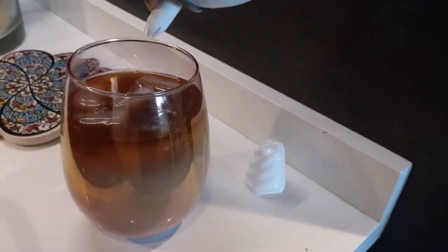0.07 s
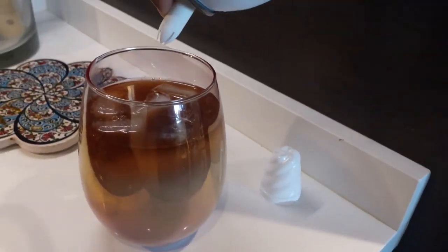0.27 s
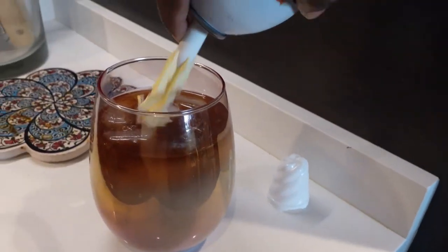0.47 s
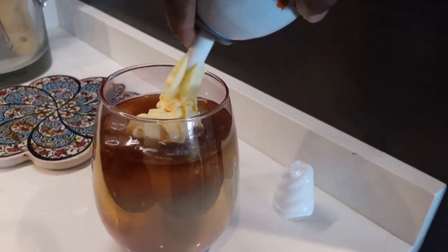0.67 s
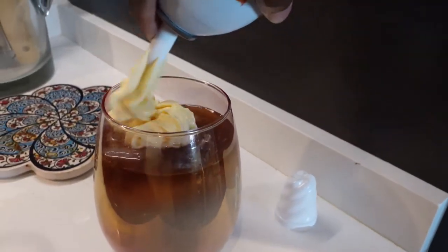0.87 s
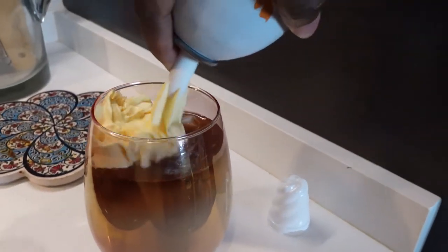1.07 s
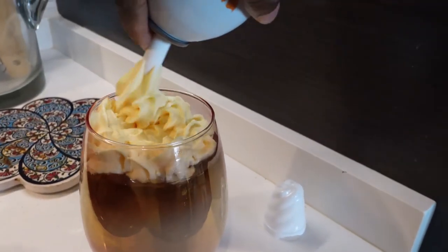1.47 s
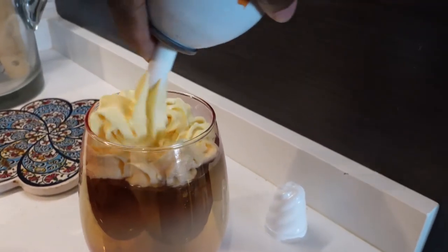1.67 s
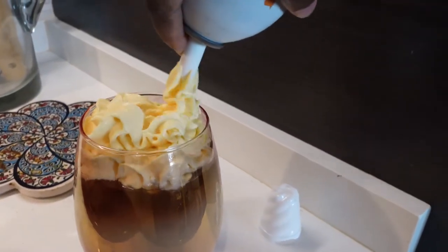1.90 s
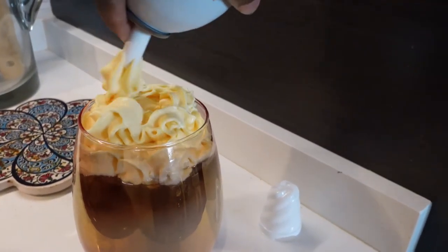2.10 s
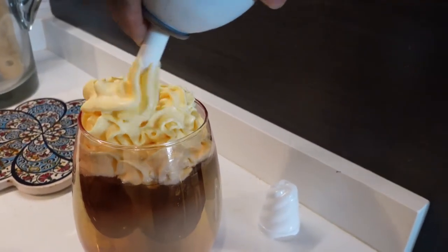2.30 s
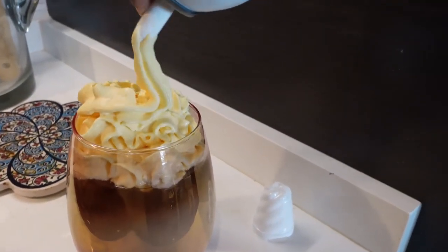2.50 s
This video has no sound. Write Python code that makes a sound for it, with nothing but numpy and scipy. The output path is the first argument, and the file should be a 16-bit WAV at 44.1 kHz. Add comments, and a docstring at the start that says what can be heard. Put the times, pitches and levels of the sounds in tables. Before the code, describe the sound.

Whipped cream sprays from a can onto a drink in a quiet kitchen, heard up close over a soft fan hum. After a quick sputter of gas comes a rough, foamy hiss with gurgling and a thin whistle, which cuts off abruptly.

```python
"""Whipped cream sprayed onto an iced drink

A can sprays close by, over a glass, in a kitchen where a fan hums. The valve knocks open and two
sputters of gas ring the empty nozzle. Foam then tears out as a rough hiss of bursting bubbles,
with a low gurgle, a thin whistle and short squeaky spits, until the finger lets go."""
import sys
import numpy as np
from scipy import signal
from scipy.fft import rfft, irfft
from scipy.io import wavfile
from scipy.ndimage import uniform_filter1d, map_coordinates

SR = 44100
rng = np.random.default_rng(int(sys.argv[2]) if len(sys.argv) > 2 else 0)


def dump(signal):
    """Clip the signal to [-1, 1] and save it as 16-bit WAV at the path in sys.argv[1]."""
    limited = np.clip(np.atleast_2d(signal).T, -1, 1)
    pcm = np.round(limited * 32767).astype(np.int16)
    wavfile.write(sys.argv[1], SR, pcm)


N = 116865
T = np.arange(N) / SR
HZ = np.fft.rfftfreq(N, 1 / SR)
FLUTTER_HZ = 129  # bandwidth of the fast level flutter in the spray


def amp(db):
    """Amplitude ratio for a level in decibels."""
    return 10 ** (np.asarray(db) / 20)


def unit(x):
    """Normalisation to an rms of 1."""
    return x / np.sqrt(np.mean(x ** 2) + 1e-20)


def spectrum_at(points, hz):
    """Interpolation on a logarithmic frequency axis."""
    frequencies, values = np.transpose(points)
    return np.interp(np.log(hz + 1), np.log(frequencies + 1), values)


def curve(rows, column=1):
    """Linear interpolation of one column of a time table at every sample."""
    rows = np.array(rows)
    return np.interp(T, rows[:, 0], rows[:, column])


def shape(x, gain):
    """Filtering as multiplication of the spectrum by a gain."""
    return irfft(rfft(x) * gain, N)


def add(mix, start_s, sound):
    """Superposition of a sound on the mix from a given time."""
    part = mix[round(start_s * SR):][:len(sound)]
    part += sound[:len(part)]


def wander(cutoff_hz):
    """Random modulation: noise from 8 Hz up to a soft cutoff, rms 1."""
    return unit(shape(rng.standard_normal(N), (HZ > 8) / np.sqrt(1 + (HZ / cutoff_hz) ** 4)))


def resonate(x, hz, width_hz):
    """Resonance with a movable centre: shift down to 0 Hz, low-pass twice, shift back."""
    carrier = np.exp(2j * np.pi * np.cumsum(hz * np.ones(len(x))) / SR)
    pole = np.exp(-np.pi * width_hz / SR)
    baseband = signal.lfilter([(1 - pole) ** 2], [1, -2 * pole, pole * pole], x / carrier + 1e-18)
    return (carrier * baseband).real


def bubbles(bursts_per_s=26000, spread_db=1.5):
    """Shot noise: tiny bubbles burst independently, as impulses of uneven size."""
    size = amp(spread_db * np.minimum(rng.exponential(1, N), 4))
    polarity = rng.choice([-1., 1.], N)
    bursts = rng.random(N) < bursts_per_s / SR
    return unit(size * polarity * bursts)


def hiss(flutter, flutter_db=1, patch_db=2, split_hz=6220):
    """Bursts in the expanding foam sum to broadband noise whose colour shifts from moment to moment."""
    # Strength of the foam's hiss: time_s, relative_db, treble_offset_db
    flow = [(.3, -37, 3.5), (.355, -33, -1), (.41, -30, -1), (.44, -29, 0), (.49, -26.5, -1),
            (.61, -25, -2.5), (.7, -26, -1.5), (.85, -26, -1), (1.1, -26, -1), (1.35, -28.5, 3),
            (1.5, -28, 1.5), (1.8, -27.5, 2), (1.86, -31, 1), (1.97, -29.5, 3.5), (2.07, -30, 3),
            (2.14, -27.5, 2.5), (2.2, -29, 3), (2.335, -30, 4), (2.36, -33, 6), (2.39, -32.5, -3)]
    # Foam spectrum, lower and upper parts: frequency_hz, density_db
    low_spectrum = [(40, -62), (150, -51), (300, -9), (450, -8.5), (540, -16.5), (660, -3), (810, -12.5),
                    (1050, -6), (1600, -3.5)]
    high_spectrum = [(2300, -9.5), (2900, -3.5), (3800, -3.5), (4900, -1.5), (6000, -1), (7500, 0),
                     (8800, 0.1), (10500, -5), (11500, -10), (13600, -8.5), (15000, -13), (15700, -10.5)]
    spectrogram = signal.stft(bubbles(), nperseg=256)[2]
    patches = rng.standard_normal(spectrogram.shape[::-1])
    patches = uniform_filter1d(patches, size=4, axis=0)  # smooth in time
    patches = unit(uniform_filter1d(patches, size=7, axis=1)).T  # and in frequency
    mottled = signal.istft(spectrogram * amp(patch_db * patches), nperseg=256)[1][:N]
    foam = shape(mottled, amp(spectrum_at(low_spectrum + high_spectrum, HZ)))
    foam *= amp(flutter_db * flutter)
    body = shape(foam, 1 / (1 + (HZ / split_hz) ** 10))
    treble = amp(curve(flow, column=2) - 0.34) * unit(foam - body)
    return amp(curve(flow)) * (amp(-2) * unit(body) + treble)


def nozzle(x):
    """Formant filtering: two nozzle resonances slide and swell as the plug of foam inside changes."""
    # Resonances of the filled nozzle: time_s, centre_hz, boost_db
    low_formant = [(.48, 3300, 4), (.6, 3050, 2), (.76, 3550, 3), (.92, 3400, 1), (1.15, 3600, 2),
                   (1.3, 4100, 5), (1.45, 4070, 5), (1.55, 3800, 0), (1.72, 3750, 1), (1.81, 3680, 5),
                   (1.87, 4000, 1), (1.93, 4170, 8), (2.02, 4050, 6), (2.1, 3800, 5), (2.2, 4100, 3.5),
                   (2.29, 4400, 6.5), (2.37, 4400, 0)]
    high_formant = [(.45, 5700, 1), (.6, 5850, 3), (.72, 5900, 2), (.8, 6550, 4), (.9, 6250, 5),
                    (1.02, 6100, 4), (1.12, 6300, 3), (1.2, 5400, 3), (1.35, 5500, 1), (1.49, 6280, 4.5),
                    (1.65, 6150, 3), (1.77, 5900, 4), (1.82, 5350, 6), (1.9, 5550, 1), (2.02, 6100, 1),
                    (2.16, 6300, 5), (2.25, 5750, 6), (2.34, 5750, 3), (2.39, 6800, 5)]
    for formant in (low_formant, high_formant):
        excess_gain = amp(curve(formant, column=2)) - 1
        x = x + 2 * excess_gain * resonate(x, curve(formant), width_hz=650)
    return x


def gurgle(flutter, flutter_db=1.54, drift_depth=0.016):
    """Forced resonance: bursts drive the nozzle's low modes, which waver as the cream moves."""
    # Strength of the gurgle: time_s, relative_db
    envelope = [(.3, -45), (.36, -33.5), (.45, -33.5), (.485, -34), (.54, -26), (.61, -24), (.68, -27.5),
                (.88, -27.5), (1.1, -32), (1.3, -30.5), (1.37, -32.5), (1.43, -28.5), (1.55, -32.5),
                (1.84, -33), (1.87, -38), (2.06, -38), (2.09, -27.5), (2.14, -41), (2.29, -32), (2.39, -48)]
    # Low modes of the nozzle: centre_hz, width_hz, relative_db
    modes = [(1030, 84, -14), (1292.5, 125, -2.5), (1475, 290, -3.5), (1711, 132, 0.5), (1900, 580, -5.5)]
    drive = bubbles() * amp(flutter_db * (flutter + wander(FLUTTER_HZ)) / np.sqrt(2))
    drift = 1 + drift_depth * wander(cutoff_hz=15.6)
    ring = sum((-1) ** k * amp(db) * unit(resonate(drive, hz * drift, width_hz))
               for k, (hz, width_hz, db) in enumerate(modes))
    return amp(curve(envelope) - 1.23) * unit(ring)


def spits(rise_s=0.002):
    """Transient excitation: each escaping gas pocket drives a resonance into a short squeak."""
    # Gas pockets passing the nozzle: start_s, relative_db, pitch_hz
    pockets = [(0.479, -16, 3340), (0.553, -15, 6500), (0.607, -10, 5900), (.713, -11.5, 5030),
               (.72, -13, 5700), (0.78, -11, 6650), (0.823, -10, 7600), (0.857, -12, 6400),
               (1.103, -10, 9300), (1.12, -23, 8800), (1.185, -11.5, 8760), (1.193, -17, 8930),
               (1.318, -9.5, 8850), (1.363, -11, 7810), (1.624, -8.5, 8150), (1.794, -16, 5400),
               (1.819, -12.5, 7700), (1.825, -13.5, 5400), (1.845, -15, 6030), (1.865, -6, 7270),
               (1.915, -13, 7450), (1.916, -19, 3940), (1.933, -10.5, 7160), (1.953, -19, 4100),
               (1.963, -12.5, 7460), (1.973, -14, 8960), (1.999, -7.5, 6960), (2.037, -10, 7560),
               (2.084, -8.5, 8300), (2.101, -13, 8300), (2.133, -9, 7850), (2.14, -13, 10900),
               (2.325, -14, 9800), (2.33, -13, 6000), (2.374, -14, 7000)]
    out = np.zeros(N)
    age = T[:1500] / rise_s
    swell = age * np.exp(1 - age)
    for start_s, db, pitch_hz in pockets:
        squeak = resonate(rng.standard_normal(len(age)), pitch_hz, width_hz=750) * swell
        add(out, start_s, amp(db - 10.3) * squeak * np.linalg.norm(swell) / np.linalg.norm(squeak))
    return out


def whistle(flutter_db=6):
    """Narrow-band noise: gas at the nozzle tip gives a fuzzy, stuttering, gliding tone."""
    # Course of the whistle: time_s, pitch_hz, level_db
    glide = [(.4, 7060, -68), (.62, 6360, -35), (.85, 8200, -34), (1.1, 9180, -36), (1.2, 8800, -33.5),
             (1.33, 8850, -31.5), (1.42, 9100, -36), (1.52, 10220, -36), (1.68, 9400, -37),
             (1.77, 8060, -31), (1.87, 7250, -36), (2.03, 7900, -31), (2.1, 7760, -44), (2.3, 8300, -40),
             (2.38, 6940, -40)]
    tone = resonate(bubbles(), curve(glide), width_hz=490)
    tone *= amp(flutter_db * wander(FLUTTER_HZ))
    return amp(curve(glide, column=2)) * unit(tone)


def modal_ring(modes, sign):
    """Impulse response as a sum of damped sines; a sign of -1 alternates their polarity."""
    t = T[:2048]
    return sum(sign ** k * amp(db - 60 * t / t60_s) * np.sin(2 * np.pi * hz * t)
               for k, (hz, db, t60_s) in enumerate(modes))


def sputter(tick_decay_s=0.002, highpass_hz=2900):
    """Impulse excitation: pops of gas ring the modes of the empty nozzle, and the first droplets tick."""
    # Gas pops as the valve opens: start_s, relative_db, upper_modes_db, decay_s
    pops = [(.2385, 1.5, -11, .0001), (.2422, -1, -11, .0002), (.2467, -2, -14, .0006),
            (.252, -8.5, -13, .002), (.258, -13, -4, .005), (.264, -15, 5, .005), (.2715, -14, 2, .003),
            (.2748, -4.8, 5.5, .003), (.2805, -3.5, 3, .0014), (.2865, -8.5, 3.5, .003),
            (.294, -15, 3, .003), (.303, -21, 6, .006), (.314, -18, 7, .008)]
    # Modes of the empty nozzle: frequency_hz, relative_db, t60_s
    lower_modes = [(3100, -11, .008), (3420, -4, .01), (3600, 0, .018), (3860, -6, .013)]
    upper_modes = [(4300, -5, .004), (4700, 1, .008), (5080, 2, .007), (5700, -3, .004), (6280, 0, .006),
                   (6640, 2, .007), (7050, -7, .004), (7700, -8, .004)]
    # Wet ticks of the droplets: start_s, level_db
    ticks = [(.2385, -29), (.2422, -20), (.2465, -22), (.2495, -28)]
    out, t = np.zeros(N), T[:2048]
    lower_ring, upper_ring = modal_ring(lower_modes, sign=1), modal_ring(upper_modes, sign=-1)
    for start_s, db, upper_db, decay_s in pops:
        puff = amp(-5) * rng.standard_normal(len(t)) * np.exp(-t / decay_s)
        puff[0] = 1  # sharp pressure front
        gain = amp(db - 12.5) * np.sqrt(1 + decay_s / 0.0016)  # longer puffs carry more energy
        for ring in (lower_ring, amp(upper_db) * upper_ring):
            response = signal.fftconvolve(puff, ring)
            add(out, start_s, gain * response * np.linalg.norm(ring) / np.linalg.norm(response))
        add(out, start_s, amp(db - 15) * puff)
    for start_s, db in ticks:
        tick = unit(resonate(rng.standard_normal(len(t)), hz=13600, width_hz=3300))
        add(out, start_s, amp(db) * tick * np.exp(-t / tick_decay_s))
    return signal.sosfilt(signal.butter(7, highpass_hz, btype="high", fs=SR, output="sos"), out)


def knock(start_s=0.2387, pitch_hz=1550, decay_s=0.0025):
    """Damped oscillation: the valve stem gives way with a small dull knock."""
    out, t = np.zeros(N), T[:2048]
    add(out, start_s, amp(-26) * np.sin(2 * np.pi * pitch_hz * t) * np.exp(-t / decay_s))
    return out


def glass(x, echo_gain=0.12, sound_m_per_s=343):
    """Comb filtering: an echo from the glass, changing in delay, sweeps soft ripples through the hiss."""
    # Detour of the echo as the nozzle circles over the glass: time_s, extra_path_m
    detour = [(.55, .2), (.72, .222), (.85, .22), (1.15, .21), (1.42, .212), (1.52, .197), (1.7, .205),
              (1.8, .23), (1.9, .209), (2.05, .21), (2.25, .202)]
    delay_s = curve(detour) / sound_m_per_s
    return x - echo_gain * map_coordinates(x, [(T - delay_s) * SR], order=3)


def spray(open_s=0.229, rise_s=0.012, shut_s=2.396, fall_s=0.013):
    """Superposition of the can's sounds in the kitchen; the valve gates the continuous ones."""
    valve = np.clip((T - open_s) / rise_s, 0, 1) * np.clip(1 - (T - shut_s) / fall_s, 0, 1)
    flutter = wander(FLUTTER_HZ)  # common to hiss and gurgle
    opening = knock() + sputter()
    stream = glass(nozzle(hiss(flutter))) + gurgle(flutter) + whistle()
    return kitchen(opening + valve * stream + spits())


def kitchen(x, patterns=5, shift_s=0.223, counter_decay_s=0.012, counter_db=-16, room_db=-12.5):
    """Reverberation: a short diffuse tail, and counter reflections that change as the can moves."""
    # Reverberation time of the room: frequency_hz, t60_s
    decay_times = [(200, 0.25), (2000, 0.76), (6000, 0.28), (15000, 0.27)]
    t = T[:SR // 2]
    hz, age_s, spectrogram = signal.stft(rng.standard_normal(len(t)) * (t > 0.006), SR, nperseg=256)
    decay = amp(-60 * age_s / spectrum_at(decay_times, hz)[:, None])
    tail = signal.istft(spectrogram * decay, SR, nperseg=256)[1][:len(t)]
    out = x + amp(room_db) * signal.fftconvolve(x, tail / np.linalg.norm(tail))[:N]
    t = T[:1024]
    for k in range(patterns):
        early = rng.standard_normal(len(t)) * (t > 0.0006) * np.exp(-t / counter_decay_s)
        crossfade = np.sin(np.pi / 2 * np.minimum((T / shift_s - k) % patterns, 2))
        out = out + amp(counter_db) * signal.oaconvolve(x * crossfade, early / np.linalg.norm(early))[:N]
    return out


def fan(rush_db=-36):
    """Stationary noise: a fan's broadband rush, with narrow bands heard as a wavering hum."""
    # Spectrum of the rush: frequency_hz, density_db
    rush_spectrum = [(20, -42), (45, -52), (80, -22), (105, -14), (130, -4.5), (170, -1), (235, -7.5),
                     (290, -4.5), (330, -8.5), (420, 0), (520, -9.5), (600, -12.5), (700, -16), (820, -16),
                     (1020, -10.5), (1200, -12), (1700, -11), (2500, -14.5), (3000, -12.5), (4500, -20.5),
                     (7000, -27.5), (10000, -38.5), (15500, -52)]
    # Hum lines: pitch_hz, level_db
    hum_lines = [(183, -47.5), (414, -52), (1020, -51.5)]
    rush = unit(shape(rng.standard_normal(N), amp(spectrum_at(rush_spectrum, HZ))))
    hum = sum(amp(db) * unit(resonate(rng.standard_normal(N), hz, width_hz=27)) for hz, db in hum_lines)
    return amp(rush_db) * rush + hum


def scene(left_db=-0.18):
    """Mid-side stereo: independent noise in the side gives the can a little width and the fan more."""
    # Stereo width of each source: frequency_hz, side_over_mid_db
    spray_width = [(50, -15), (150, -69), (700, -22), (2500, -42), (4500, -19), (7000, -13), (9500, -15),
                   (13000, -33.5)]
    fan_width = [(50, -24), (170, -22), (450, -20), (1500, -11.5), (5000, -12.5), (15000, -17)]
    mid = spray() + fan()
    side = shape(spray(), amp(spectrum_at(spray_width, HZ)))
    side += shape(fan(), amp(spectrum_at(fan_width, HZ)))
    return np.array([amp(left_db) * (mid + side), mid - side])


def record(dry):
    """Band limiting: a steep low-pass filter removes the highest treble."""
    lowpass = signal.firwin(801, cutoff=15780, window=("kaiser", 9), fs=SR)
    return signal.oaconvolve(dry, lowpass[None], "same")


dry = scene()
out = record(dry)
dump(out)
```